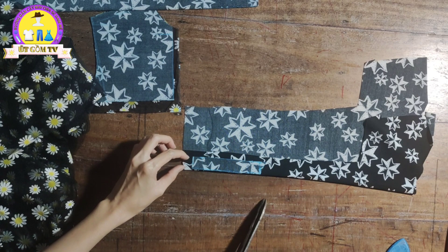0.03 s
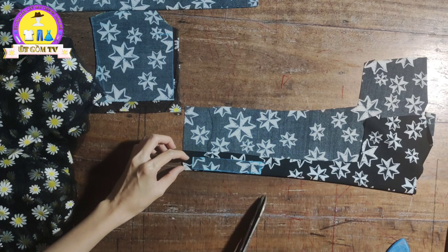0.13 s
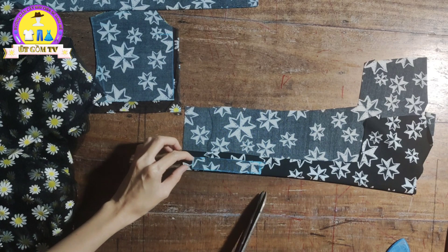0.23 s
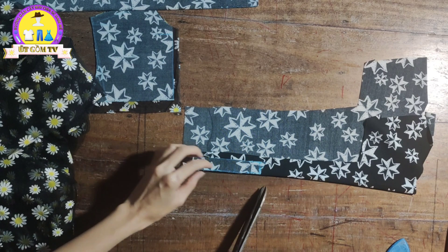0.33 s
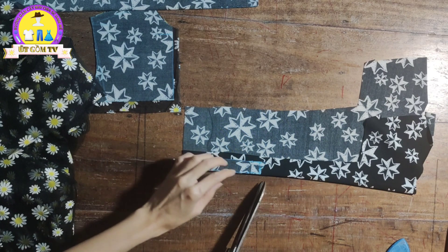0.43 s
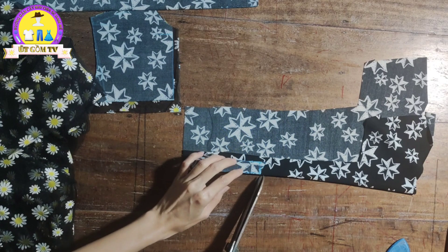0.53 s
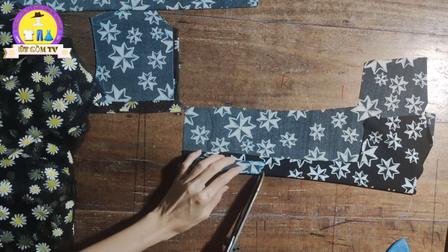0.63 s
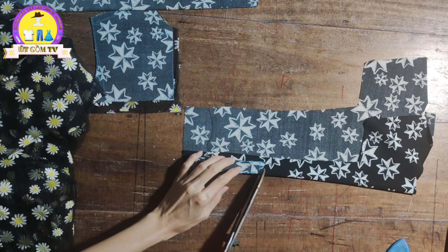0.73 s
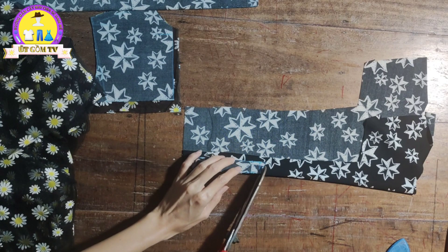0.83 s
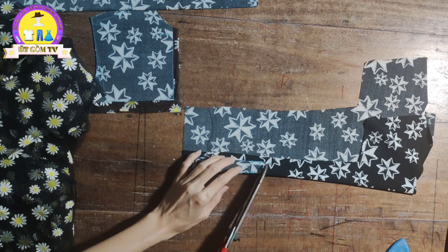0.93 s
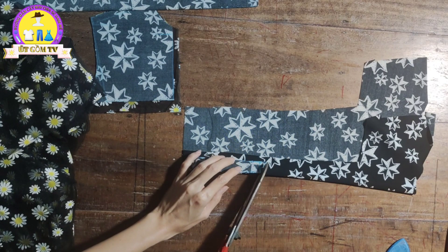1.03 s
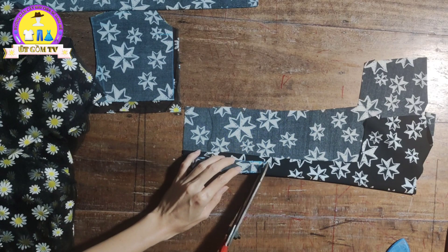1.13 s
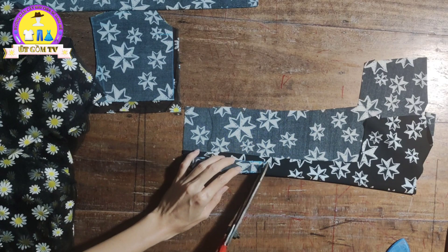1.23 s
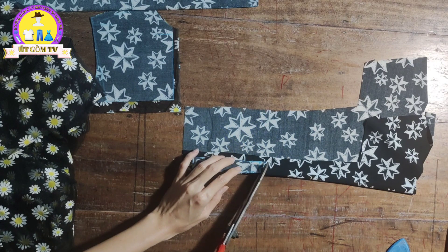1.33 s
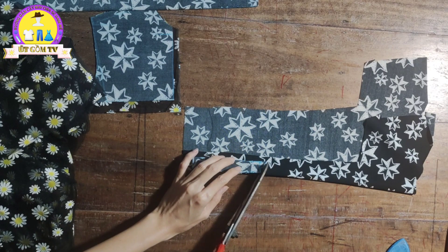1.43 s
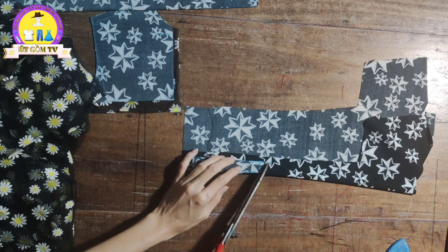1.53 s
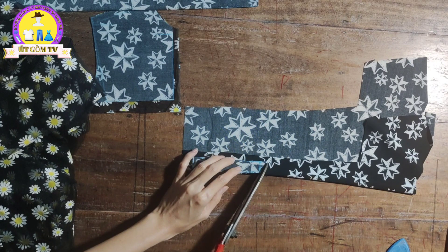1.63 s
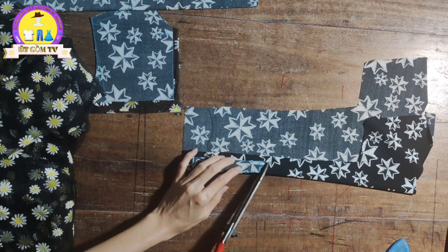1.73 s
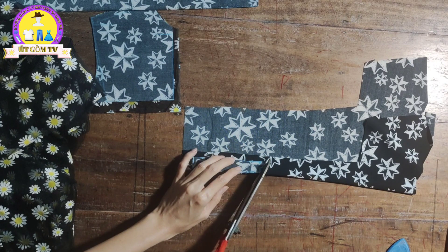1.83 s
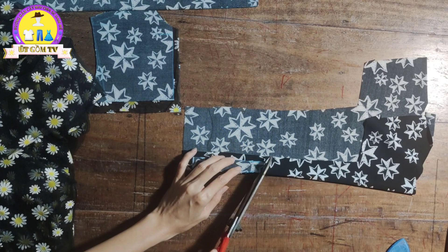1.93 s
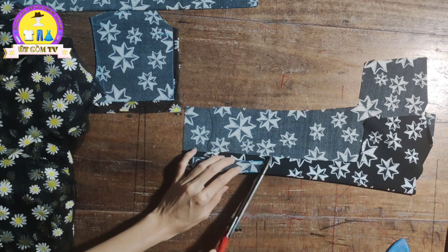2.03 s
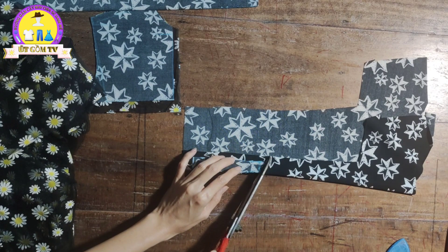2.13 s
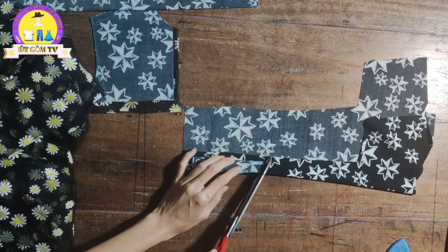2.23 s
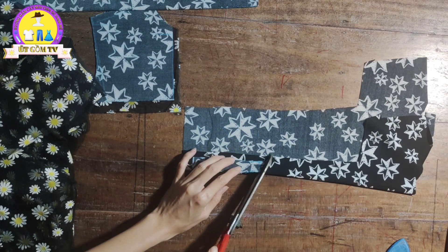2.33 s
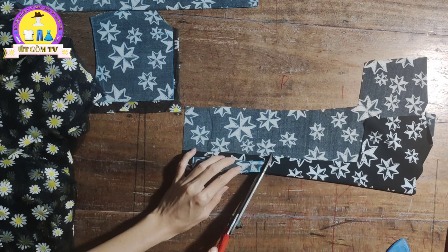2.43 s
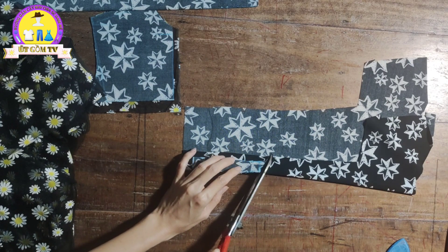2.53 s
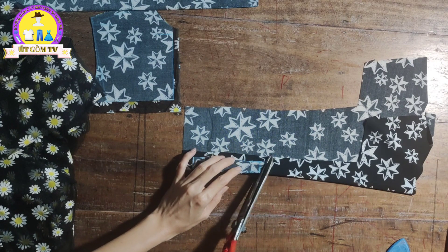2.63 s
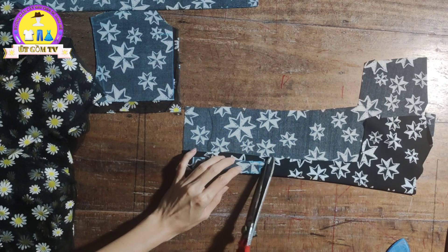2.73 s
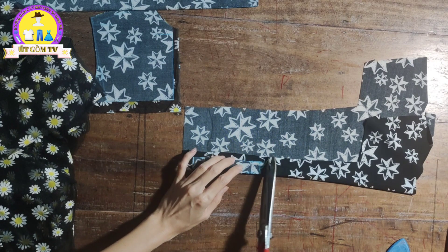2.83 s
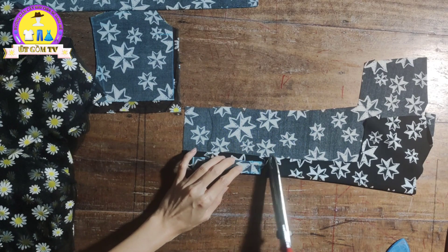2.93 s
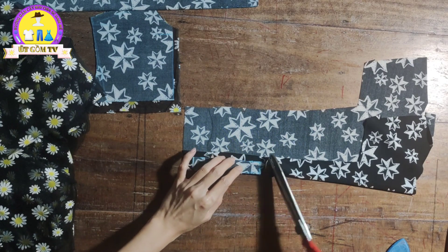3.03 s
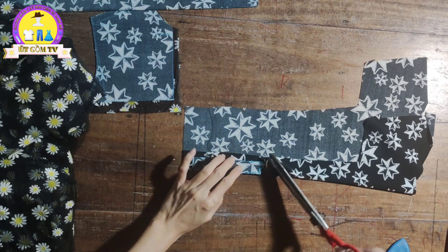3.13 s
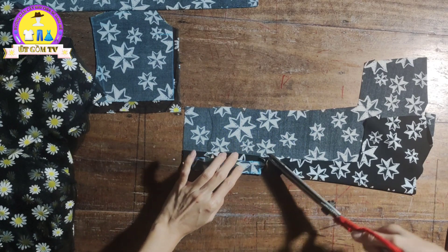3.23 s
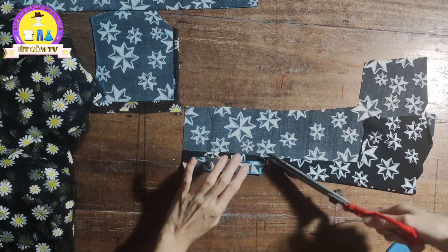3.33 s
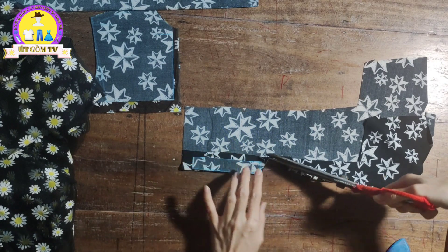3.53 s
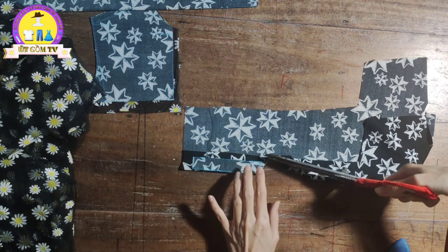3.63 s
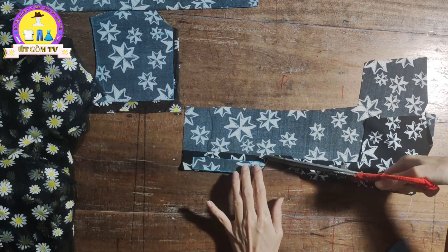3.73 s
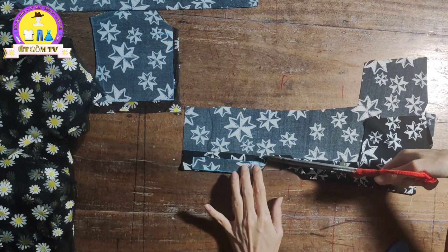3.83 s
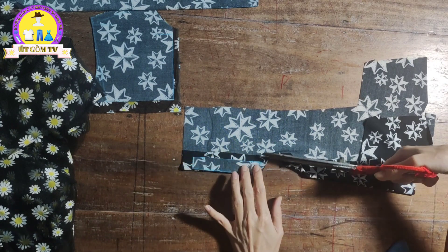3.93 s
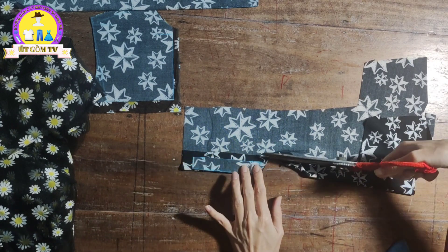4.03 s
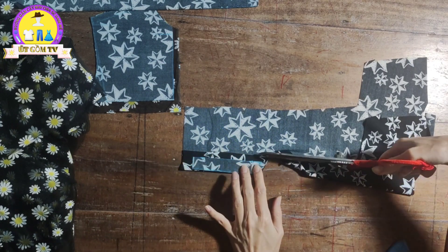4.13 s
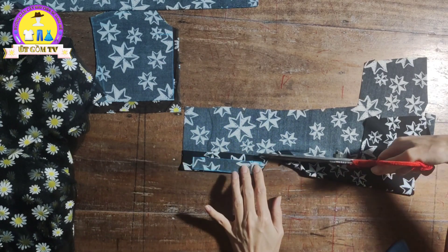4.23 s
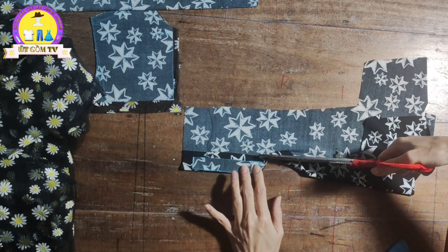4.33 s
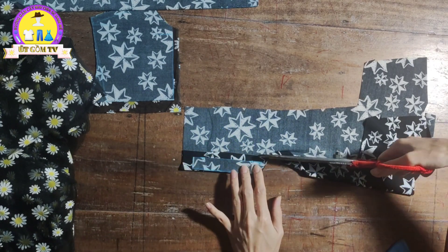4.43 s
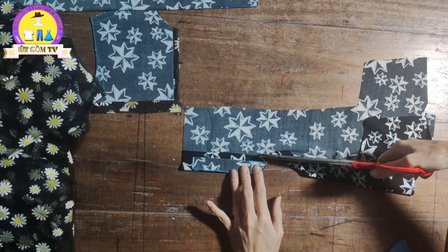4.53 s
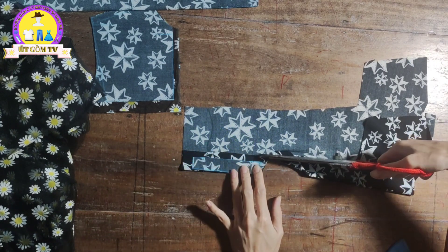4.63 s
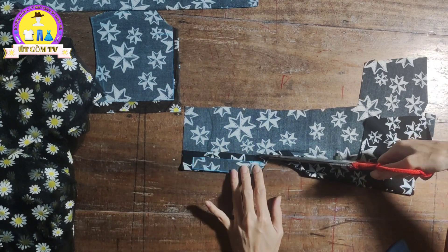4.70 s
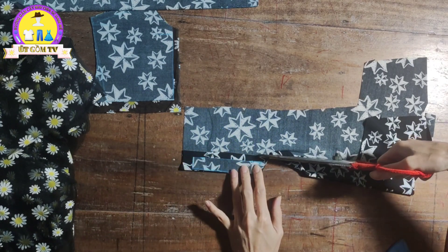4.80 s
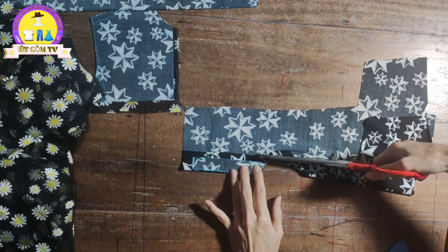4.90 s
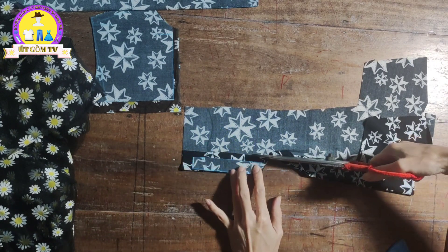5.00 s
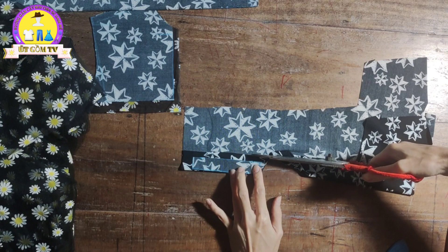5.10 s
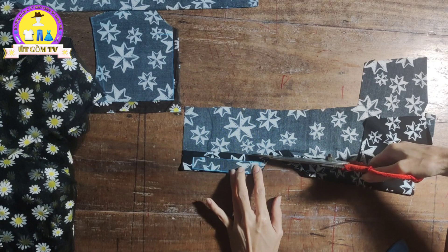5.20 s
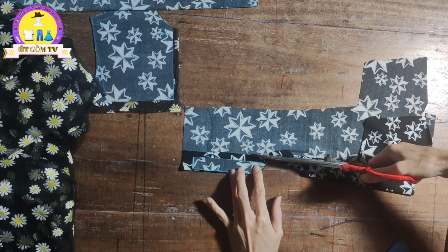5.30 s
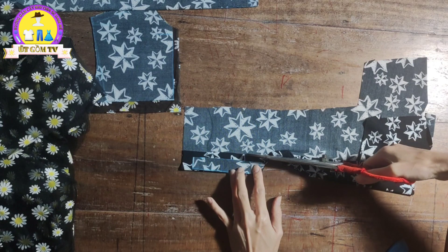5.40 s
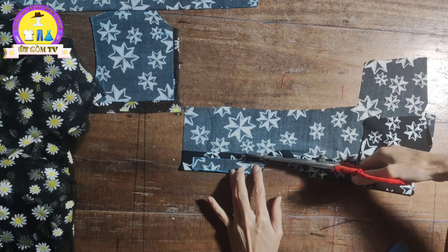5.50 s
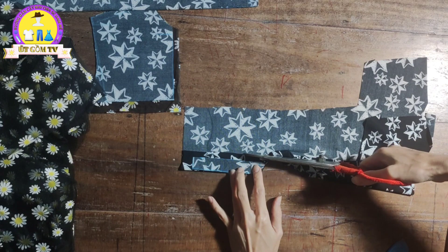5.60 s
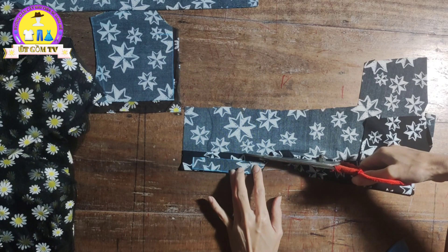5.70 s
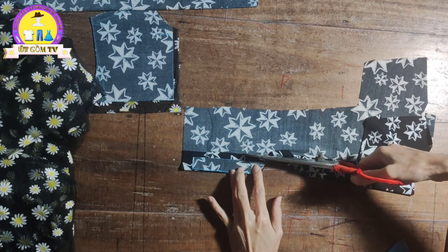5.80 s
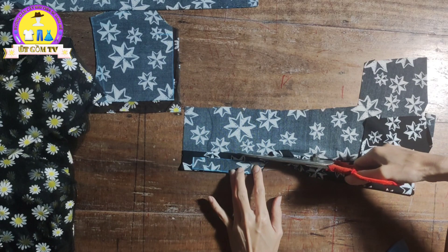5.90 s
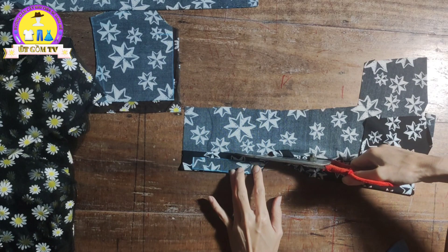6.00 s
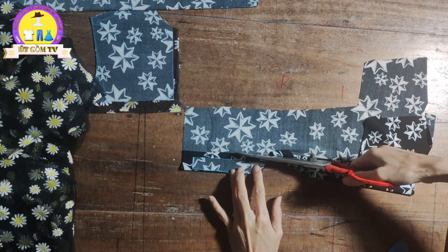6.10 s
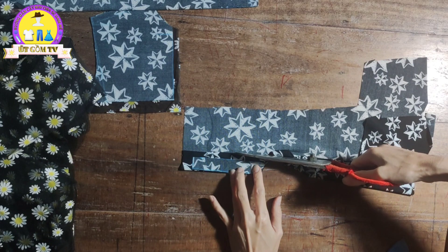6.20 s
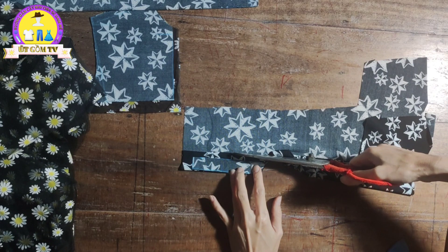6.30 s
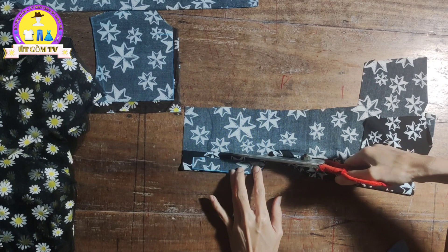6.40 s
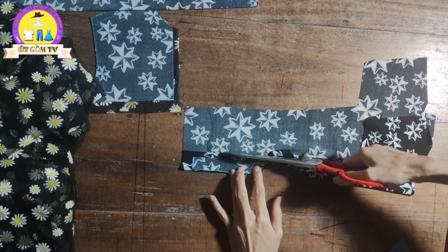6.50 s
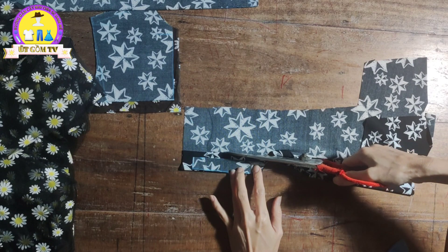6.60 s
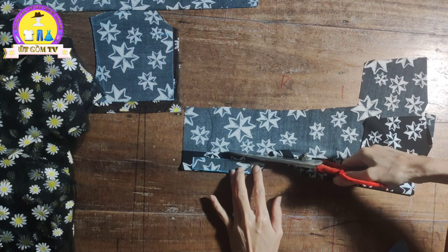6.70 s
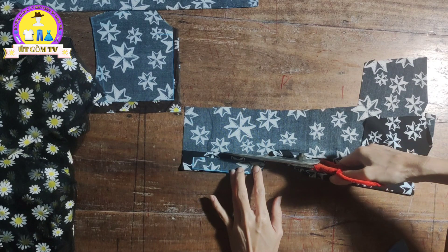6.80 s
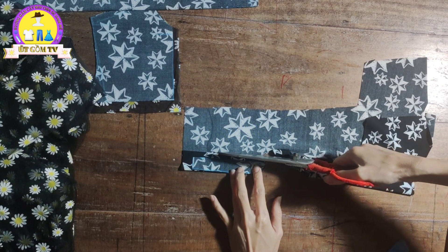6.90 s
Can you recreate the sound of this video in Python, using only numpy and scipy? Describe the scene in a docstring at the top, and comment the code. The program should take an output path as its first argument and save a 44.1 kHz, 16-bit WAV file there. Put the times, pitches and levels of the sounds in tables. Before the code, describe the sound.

Hands brush softly over a wooden table, then scissors cut thin cloth in a quick cluster of crunchy strokes ending in a sharp handle clack. After a pause of light sliding, slower even strokes follow, the last also clacking shut. Faint high trills and an insect hiss come from outdoors. Close stereo microphones in a small, dry room with low rumble.

```python
"""Scissors cutting cloth on a table

Scissors resting on a wooden table cut thin stretchy cloth in eight strokes; twice the handles clap shut.
Random clicks and jolts ring the modes of table top and handles; fine thread snaps ring the blades.
Hands and steel slide on the wood between strokes: dense clicks swell and fade through its modes.
Two small animals trill outdoors, one higher and one lower, as gliding sines with noisy envelopes.
Shaped noise gives a thin insect hiss and the room's rumble."""
import sys
import numpy as np
from scipy import signal
from scipy.fft import rfft, irfft
from scipy.io import wavfile
from scipy.ndimage import uniform_filter1d

SR = 44100
rng = np.random.default_rng(int(sys.argv[2]) if len(sys.argv) > 2 else 0)


def master_out(mix):
    """Clip the mix to full scale and print it as 16-bit PCM to the path in sys.argv[1]."""
    frames = np.transpose(np.atleast_2d(mix))
    ceiling = np.clip(frames, -1, 1)
    pcm = np.round(ceiling * 32767).astype(np.int16)
    wavfile.write(sys.argv[1], SR, pcm)


N = 306495

# All levels in the tables are relative.
# Rumble, room tone and distant insects: (frequency [Hz], spectral density [dB])
AIR_SPECTRUM = [(13, -26.5), (22, 4), (59, -3.5), (241, -14.5), (325, -15), (963, -22), (2710, -21.5),
                (3020, -20), (3650, -26.5), (4790, -22), (5340, -33.5), (8250, -17.5), (11700, -36),
                (13500, -29.5), (14600, -38.5)]
# Depth of the drifting patches in the air: (frequency [Hz], depth [dB])
PATCH_DEPTH = [(100, 2.9), (2000, 2.5), (6000, 1.2), (14000, 1.5)]
# Likeness of the air at the two sides: (frequency [Hz], correlation [-1 to 1])
LIKENESS = [(60, 0.87), (240, 0.58), (940, -0.2), (3710, 0.028), (14600, -0.042)]
# Reverberation time before scaling: (frequency [Hz], t60 [s])
ROOM_DECAY = [(100, 0.1533), (500, 0.14), (1600, 0.27), (4000, 0.31), (10000, 0.18)]
# Phrases of the two callers: (first note [s], time to last note [s], first pitch [Hz], last pitch [Hz],
# first level [dB], last level [dB])
PHRASES = [(.068, 0.14, 2945, 2945, -47.5, -41.5), (0.192, 0.059, 3210, 3240, -47.5, -46),
           (.3, 0.057, 3190, 2830, -49, -51), (0.444, .16, 3076, 3150, -45.5, -46),
           (.527, 0.14, 2850, 2800, -45.5, -46.5), (.774, 0.08, 3280, 3310, -47, -46),
           (.855, 0.14, 3030, 2963, -46, -41), (1.415, 0.036, 2990, 2990, -45.5, -46.5),
           (2.136, 0.16, 3125, 3280, -48.5, -45), (2.457, 0.22, 2936, 2964, -45.5, -43),
           (3.06, 0.15, 3220, 3230, -52, -48.5), (3.458, 0.075, 3000, 2980, -43, -41),
           (4.122, .216, 3295, 3080, -49, -47), (4.265, .072, 2960, 2925, -45, -43.5),
           (4.748, 0.2, 3300, 3140, -47.5, -45), (4.82, .14, 3013, 2950, -45, -43),
           (5.669, .075, 3250, 3270, -44, -49.5), (5.67, 0.11, 2950, 2985, -43, -52),
           (6.349, 0.14, 3000, 2874, -48, -43), (6.441, .06, 3100, 3200, -44.5, -41.5)]
# A hand sweeps to and fro over the far part of the table: (loudest at [s], length [s], level [dB])
SWEEPS = [(.33, 0.62, -48), (.51, .35, -46), (.8, 0.63, -60)]
# Hands, cloth and steel slide on the wood: (loudest at [s], length [s], level [dB],
# table boom over that [dB], handles over that [dB])
SLIDES = [(1.35, 0.22, -57.5, -9, 1), (1.72, 0.31, -52, -3, -13), (1.85, 0.53, -47, 4, -5.5),
          (2.23, 0.29, -47.5, -4, -7.5), (2.5, 0.31, -46, -10, -7), (2.6, 0.14, -47, -4, -19),
          (3.16, 0.27, -52.5, -1, -18), (3.46, 0.43, -59, -22, -18.5), (3.71, 0.17, -48, 2, -15),
          (3.93, 0.086, -52, 5, -13), (4.12, 0.19, -55, -11, -5), (4.23, 0.11, -56.5, -5, -13),
          (4.47, 0.13, -54.5, 5.5, -16), (4.86, 0.13, -42.5, -0.5, -10), (4.96, 0.3, -54.5, -8, 1.5),
          (5.32, 0.37, -51.5, -2, -3.5), (5.75, 0.29, -58, -7, -14), (5.9, 0.63, -56, -6, -0.5),
          (6.32, 0.32, -48.5, 2.5, -2.5), (6.74, 0.14, -44.5, 0.5, -21), (6.83, 0.36, -53.5, -16, 2.5)]
# Pushes of the closing hand: (start [s], length [s], first level [dB], last level [dB],
# and over those: table boom [dB], handles [dB], blades at first [dB], blades at last [dB])
PUSHES = [(1.468, 0.011, -26, -26.5, -16, -9, -9, -21), (1.504, 0.018, -8.5, -38, -9, -3, -12, -13),
          (1.529, 0.063, -21.5, -37, 1.5, -4, -13.5, -7.5), (1.604, 0.024, -49, -40, 0, 11, -8, 3.5),
          (1.981, .012, -18.5, -29, -4, -8, -26, -14.5), (1.998, 0.022, -39, -27.5, -3, 1, -4, -15),
          (2.024, 0.057, -19, -22.5, -6, -6, -16.5, -16), (2.321, 0.012, -19, -34.5, -12, -11, -16, -23),
          (2.348, .02, -33, -40, -7, 4, -1, -17), (2.372, 0.019, -15, -15.5, -22, 1.5, -13, -7.5),
          (4.591, 0.079, -45, -59, 23.5, -8.5, -5, 6.5), (5.073, 0.061, -31, -35, -5, -8.5, -18, -14.5),
          (5.129, 0.014, -25, -36.5, -1, -18, -10.5, -11), (5.55, 0.015, -38, -38, 7, -3, -17, -13),
          (5.57, 0.08, -23, -35, -5.5, 1.5, -17, -8), (6.041, .055, -26.5, -24.5, -5.5, -4.5, -23, -13.5),
          (6.107, 0.047, -18.5, -36, -2, -4, -17, -18), (6.526, 0.053, -27.5, -31.5, -2, -10, -14, -24.5),
          (6.584, .013, -32, -18, -9, 5, -16, -9.5)]
# The blades bite harder for a moment: (start [s], level [dB], and over it: table boom [dB], handles [dB],
# blades [dB]; fade t60 [s], opening jolt over the surge [dB])
BITES = [(1.476, -15.5, -19, -9, -17.5, 0.088, 19.5), (1.511, -19, -5, -5.5, -12.5, 0.051, 22.5),
         (1.546, -26.5, -11, -20, -12, .032, 20), (1.562, -31.5, -1, 4, -8.5, 0.069, 23.5),
         (1.613, -32.5, 4, 6.5, -13, .05, 20), (1.627, -23, -6, -5, -13, .032, 13.5),
         (1.986, -25, -2.5, -21, -28, .04, 27), (2.023, -9.5, -7, -5, -19.5, 0.064, 16.5),
         (2.048, -15, -3.5, -4.5, -30, .054, 21), (2.086, -30, -25, -24, 1.5, 0.029, 19.5),
         (2.209, -39, -1, -10, -8, 0.043, 18), (2.333, -19, -1.5, -14.5, -19, .038, 22.5),
         (2.353, -27, -30, -4, -7, .05, 12.5), (2.562, -33.5, -9.5, -5.5, -16, 0.091, 20.5),
         (4.597, -50, 25, -18, 2.5, .05, 21.5), (4.631, -41.5, -5, -30.5, -6, 0.058, 22.5),
         (4.846, -42, -16, -26, -5.5, 0.054, 20.5), (5.081, -32.5, -11, -2.5, -23, 0.04, 24.5),
         (5.101, -22.5, -8.5, -9, -31, 0.058, 21.5), (5.136, -25, -12, -18, -23, 0.06, 25),
         (5.556, -28.5, 6, -7, -21, 0.062, 20.5), (5.576, -24, 4.5, 2.5, -17, .06, 20),
         (5.605, -25, -15, -6, -17, .037, 24), (5.625, -21.5, -24, -20, -24, 0.04, 20),
         (6.045, -23, -8, -3, -26, .061, 19), (6.077, -18.5, -15, -6.5, -18, 0.044, 21),
         (6.108, -17.5, -6, -12, -11.5, 0.073, 21), (6.127, -24, 4, -24, -17, 0.033, 18),
         (6.537, -27, -10, -1.5, -22, 0.046, 20.5), (6.556, -22.5, -14, -17, -16.5, 0.064, 22)]
# The handles clap shut: (time [s], level [dB])
CLAPS = [(2.3959, -4.5), (6.601, -4.5)]

# Modes of the far part of the table: (frequency [Hz], width [Hz], level [dB])
FAR_TABLE_MODES = [(268.6, 150, -5.5), (481, 42, 2), (735, 33.5, -6), (832.6, 29, -1.5), (1108, 108, -11),
                   (1212, 64, -10.5), (2190, 3200, -20.5)]
# Modes of the table top: (frequency [Hz], width [Hz], level [dB])
TABLE_MODES = [(196, 130, -0.5), (257.7, 84, 4.5), (327.5, 30.9, 1), (466, 66, -1.5), (530.2, 57, -6),
               (627.5, 33, -7), (788, 24, -8.5)]
# Lowest modes of the table top: (frequency [Hz], width [Hz], level [dB])
BOOM_MODES = [(81.3, 34.3, -4.5), (102.9, 17, 0), (144.5, 19.8, 4), (172.2, 86, -9.5)]
# Modes of the handles: (frequency [Hz], width [Hz], level [dB])
HANDLE_MODES = [(866, 56, 3.5), (931, 41.6, 8.5), (1057, 59.5, 4.5), (1130, 80, 4), (1309, 124, 3),
                (1428, 120, -4), (1520, 82.6, -3), (1755, 100, -21.5)]
# Modes of the blades: (frequency [Hz], width [Hz], level [dB])
BLADE_MODES = [(2343, 47, 15), (2920, 140, -9.5), (3383, 150, 0.5), (4530, 120, -6), (5090, 140, 6.5),
               (6890, 200, -18.5), (8220, 94, -2), (9750, 280, 3.5), (10880, 470, -6.5), (10700, 97, -3.5),
               (13460, 170, -6)]
# Spectrum of the parting fibres: (frequency [Hz], spectral density [dB])
FIBRE_SPECTRUM = [(1060, -39.5), (1800, -1.5), (2990, 1), (3880, -4.5), (4960, -4.5), (9540, -8),
                  (10400, -7), (13500, -11), (14500, -26.5)]
# Wide, quickly damped modes of the closed handles: (frequency [Hz], width [Hz], level [dB])
CLAP_MODES = [(1047, 89.2, -3.5), (1400, 190, 1.5), (1978, 180, -4.5), (2290, 240, -4.5),
              (2830, 480, -12.5), (3337, 980, -15.5), (4630, 380, -20)]
# Left over right microphone: (frequency [Hz], level [dB])
MICROPHONE_LEAN = [(60, 0.5), (150, 0), (380, 2.5), (940, 0), (2340, 0.5), (5860, -3), (14600, 0.5)]
# Rise of a push: (table [s], boom [s], handles [s], blades [s])
PUSH_RISE_S = (0.00386, 0.01, 0.0018, 0.015)
# Decay t60 after a push: (table [s], boom [s], handles [s], blades [s])
PUSH_RELEASE_S = (.15, 0.18, 0.043, .05)

# Column numbers of the driven bodies
TOP, LOW, GRIP, EDGE = 1, 2, 3, 4

AIR_RMS_DB = -51
NOTE_GAP_S, NOTE_FALL_HZ_PER_S, NOTE_PEAK_S = 0.078, 3000, 0.022
SWELL_RISE_SHARE, SWELL_ENDS_DB = 0.53, -22.5  # share of the length spent rising, level at both ends
FADE_IN_S, FADE_IN_DB = 0.051, -10.5  # low boom fades in shortly before each push
CRACK_DB, CRACK_S = 1.5, 0.0004  # the blow of the handles heard directly
BAND_LIMIT_HZ = 14350


def gain_of(db):
    """Level: 20 dB are a factor of ten in amplitude."""
    return 10 ** (np.asarray(db) / 20)


def evened(x):
    """Normalisation: scale to an RMS of 1."""
    return x / np.sqrt(np.mean(x ** 2) + 1e-20)


def read(points, hz):
    """Logarithmic pitch scale: interpolate a curve evenly in log frequency."""
    f, value = np.transpose(points)
    return np.interp(np.log(hz + 1), np.log(f + 1), value)


def air():
    """Stationary noise: random spectra shaped into rumble and hiss, with drifting patches of level."""
    frames, hz = N // 512 + 5, np.fft.rfftfreq(2048, 1 / SR)
    a, b, c, d, patches = rng.standard_normal((frames, 1025, 5)).T
    patches = uniform_filter1d(patches, 20, 0)
    patches = evened(uniform_filter1d(patches, 8, 1))
    same = np.clip(read(LIKENESS, hz), -1, 1)[:, None]
    left = a + 1j * b
    right = same * left + np.sqrt(1 - same ** 2) * (c + 1j * d)
    level_db = read(AIR_SPECTRUM, hz)[:, None] + read(PATCH_DEPTH, hz)[:, None] * patches
    spectra = np.array([left, right]) * gain_of(level_db)
    noise = signal.istft(spectra, nperseg=2048, noverlap=1536)[1][:, :N]
    return gain_of(AIR_RMS_DB) * evened(noise)


def room(x, decay_scale):
    """Reverberation: sparse reflections of random sign, each band decaying at its own rate."""
    taps = np.zeros((2, SR // 2))
    start = np.arange(120, SR // 2 - 20, 20)
    at = start + rng.integers(0, 20, (2, len(start)))
    np.put_along_axis(taps, at, rng.choice([-1., 1.], at.shape), 1)
    hz, t, z = signal.stft(taps, SR, nperseg=256)
    alike = np.exp(-(hz / 600) ** 2)[:, None]  # long waves arrive alike at both sides
    z[1] = alike * z[0] + np.sqrt(1 - alike ** 2) * z[1]
    t60 = decay_scale * read(ROOM_DECAY, hz)[:, None]
    tail = signal.istft(z * gain_of(-60 * t / t60), SR, nperseg=256)[1]
    return signal.oaconvolve(x[None], tail / np.linalg.norm(tail[0]), axes=1)[:, :N]


def notes():
    """Phrasing: evenly spaced notes glide in pitch and level; returns (time [s], level [dB], pitch [Hz])."""
    out = []
    for first, span, first_hz, last_hz, first_db, last_db in PHRASES:
        count = round(span / NOTE_GAP_S) + 1
        start, end = [first, first_db, first_hz], [first + span, last_db, last_hz]
        out += list(np.linspace(start, end, count))
    return out


def trill():
    """Narrow-band modulation: falling sines with noisy amplitude and phase, unlike at the two sides."""
    t, out, calls = np.arange(3500) / SR, np.zeros((2, N + 3500)), notes()
    from_peak = t - NOTE_PEAK_S
    shape = np.exp(-(from_peak / 0.022) ** 2)
    noise = rng.standard_normal((len(calls), 2, 2, 3500))
    husk = uniform_filter1d(noise, 170, axis=3) * np.sqrt(85)  # widens each note
    for (s, db, hz), (in_phase, quadrature) in zip(calls, husk):
        at = round(s * SR)
        turn = 2 * np.pi * (hz * t - NOTE_FALL_HZ_PER_S / 2 * from_peak ** 2)
        whistle = (in_phase + 0.66) * np.sin(turn) + quadrature * np.cos(turn)
        out[:, at:at + 3500] += gain_of(db) * shape * whistle
    direct = gain_of(-7.5) * out[:, :N]
    return direct + gain_of(-13.0) * room(out[0, :N], decay_scale=1.0)


def ring(modes):
    """Modal superposition: damped sines answer one tap of a body; energy 1."""
    t, out = np.arange(8192) / SR, np.zeros(8192)
    for k, (hz, width, db) in enumerate(modes):
        decay = np.exp(-np.pi * width * t)
        out += (-1) ** k * gain_of(db) * width * decay * np.sin(2 * np.pi * hz * t)
    return out / np.linalg.norm(out)


def through(drive, response):
    """Linear response: convolution lets one body sound every channel of the drive."""
    return signal.oaconvolve(drive, response[None], axes=1)[:, :N]


def snaps(per_s, spread_db):
    """Random point process: clicks of both signs, a few of them large."""
    size_db = spread_db * np.minimum(rng.exponential(1, N), 4)
    size = gain_of(size_db) * rng.choice([-1., 1.], N)
    return evened(size * (rng.random(N) < per_s / SR))


def spread(per_s, spread_db, same):
    """Partial coherence: clicks at two microphones, partly shared and partly each one's own."""
    both, left, right = (snaps(per_s, spread_db) for _ in range(3))
    return np.sqrt(same) * both + np.sqrt(1 - same) * np.array([left, right])


def swells(rows, column):
    """Exponential growth and decay: gain of slides that swell and die away evenly in dB."""
    out, t = np.zeros(N), np.arange(N) / SR
    for row in rows:
        s, length, db = row[:3]
        if column > TOP:
            db += row[column + 1]
        rising, falling = (s - t) / SWELL_RISE_SHARE, (t - s) / (1 - SWELL_RISE_SHARE)
        out += gain_of(db + SWELL_ENDS_DB * np.where(t < s, rising, falling) / length)
    return out


def rubbing(snag_db):
    """Friction noise: dense soft clicks whose strength wanders as the skin snags unevenly."""
    snags = uniform_filter1d(rng.standard_normal(N), size=900)
    snags = evened(uniform_filter1d(snags, size=900))
    return spread(2500, 2.1, same=0.82) * gain_of(snag_db * snags)


def sweeping():
    """Friction-driven resonance: a sweeping hand rings the modes of the far part of the table."""
    return through(rubbing(snag_db=1.55) * swells(SWEEPS, TOP), ring(FAR_TABLE_MODES))


def sliding():
    """Friction-driven resonance: one rubbing excites the table, its boom and the handles."""
    rub, out = rubbing(snag_db=3.5), np.zeros((2, N))
    for column, modes in [(TOP, TABLE_MODES), (LOW, BOOM_MODES), (GRIP, HANDLE_MODES)]:
        out += through(rub * swells(SLIDES, column), ring(modes))
    return gain_of(-6.0) * out


def tick(points):
    """Minimum phase: the folded cepstrum gives a causal click with this spectrum; energy 1."""
    spectrum_db = np.maximum(read(points, np.fft.rfftfreq(2048, 1 / SR)), -80)
    cepstrum = irfft(np.log(gain_of(spectrum_db)))
    cepstrum[1:1024] *= 2
    cepstrum[1025:] = 0
    out = irfft(np.exp(rfft(cepstrum)))
    return out / np.linalg.norm(out)


def pushes(column):
    """Forced excitation: gain for one body with quick grip, even change in dB and decaying release."""
    out, t = np.zeros(N), np.arange(N) / SR
    for s, length, first_db, last_db, boom, handles, *blades in PUSHES:
        u = t - s
        share = [(0, 0), (boom, boom), (handles, handles), blades][column - 1]
        db = np.interp(u, [0, length], np.add([first_db, last_db], share))
        rise = np.clip(u / PUSH_RISE_S[column - 1], 0, 1)
        if column == LOW:
            fade_in = gain_of(FADE_IN_DB) * np.clip(1 + u / FADE_IN_S, 0, 1)
            rise = np.maximum(rise, fade_in)
        out += rise * gain_of(db - 60 * np.maximum(u - length, 0) / PUSH_RELEASE_S[column - 1])
    return out


def bites(column, rise_s):
    """Impulsive excitation: gain of the short surges, and the single jolt near the start of each."""
    surge, jolts, t = np.zeros(N + 4000), np.zeros(N), np.arange(4000) / SR
    for row in BITES:
        s, db, fade_s, jolt_db = row[0], row[1], row[5], row[6]
        if column > TOP:
            db += row[column]
        at = round(s * SR)
        surge[at:at + 4000] += (1 - np.exp(-t / rise_s)) * gain_of(db - 60 * t / fade_s)
        jolts[at + 40] = gain_of(db + jolt_db)
    return surge[:N], jolts


def cutting():
    """Stick-slip and fracture: slips of the edge drive wood and handles; fibre snaps ring the blades."""
    slips, fibres = spread(2000, 5.4, same=0.47), spread(3000, 3.2, same=0.4)
    near = slips.mean(0)
    out = np.zeros((2, N))
    bodies = [
        (TOP, 0.96 * near + 0.15 * slips, TABLE_MODES),
        (LOW, near[None], BOOM_MODES),  # long waves reach both sides alike
        (GRIP, slips, HANDLE_MODES),
    ]
    for column, train, modes in bodies:
        surge, jolts = bites(column, rise_s=0.002)
        force = gain_of(-5.0) * pushes(column) + gain_of(-23.0) * surge
        out += through(train * force + jolts, ring(modes))
    surge, _ = bites(EDGE, rise_s=0.0032)
    edge = gain_of(-7.5) * pushes(EDGE) + gain_of(-6) * surge
    edge = uniform_filter1d(edge, size=180)  # tearing swells a little slower than the jolt
    # fibres part in bunches, when the edge slips most
    clumps = evened(uniform_filter1d(abs(near), size=130)) ** 0.9
    steel = gain_of(-0.5) * ring(BLADE_MODES)[:2048] + gain_of(7.5) * tick(FIBRE_SPECTRUM)
    return out + through(fibres * edge * clumps, steel)


def claps():
    """Impact: a short blow and its fading rattle ring handles and blades and thump the table."""
    t, drive, crack = np.arange(2000) / SR, np.zeros((2, N + 2000)), np.zeros(N)
    fade = gain_of(-30 - 60 * t / 0.097) * (t > 0.001)
    rattle = rng.standard_normal((len(CLAPS), 2, 2000)) * fade
    pulse = signal.windows.hann(round(CRACK_S * SR))
    for (s, db), shake in zip(CLAPS, rattle):
        at = round(s * SR)
        drive[:, at:at + 2000] += gain_of(db) * shake
        drive[:, at:at + 8] -= gain_of(db) * signal.windows.hann(8) / 4
        crack[at:at + len(pulse)] -= gain_of(db + CRACK_DB) * pulse
    body = gain_of(17.0) * ring(CLAP_MODES) + gain_of(14.5) * ring(TABLE_MODES)
    body += gain_of(5.0) * ring(BOOM_MODES) + gain_of(-4.0) * ring(BLADE_MODES)
    return through(drive[:, :N], body) + crack


def scene():
    """Superposition: outdoor calls and air add to the table's direct and reverberant sound."""
    background = air() + trill()
    near = sweeping() + sliding() + cutting()
    clap = claps()
    to_room = gain_of(-6.5) * near.mean(0) + gain_of(-7.5) * clap.mean(0)
    table = near + clap + room(to_room, decay_scale=0.71)
    # high-pass keeps the table sounds free of deep rumble
    table = signal.lfilter(*signal.butter(2, 62., "high", fs=SR), table)
    return background + table


def record(dry):
    """Transduction: unequal microphones, clipping at full scale, then the band limit."""
    lean_db = read(MICROPHONE_LEAN, np.fft.rfftfreq(N + 1, 1 / SR))
    lean = gain_of(np.outer([.5, -.5], lean_db))
    heard = irfft(rfft(dry, N + 1) * lean, N + 1)[:, :N]
    clipped = np.clip(heard, -1, 1)
    low_pass = signal.firwin(511, BAND_LIMIT_HZ, window=("kaiser", 9), fs=SR)
    return signal.oaconvolve(clipped, low_pass[None], "same")


dry = scene()
out = record(dry)
master_out(out)
```